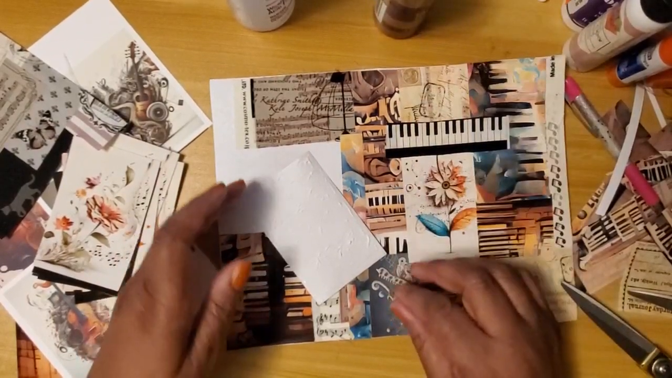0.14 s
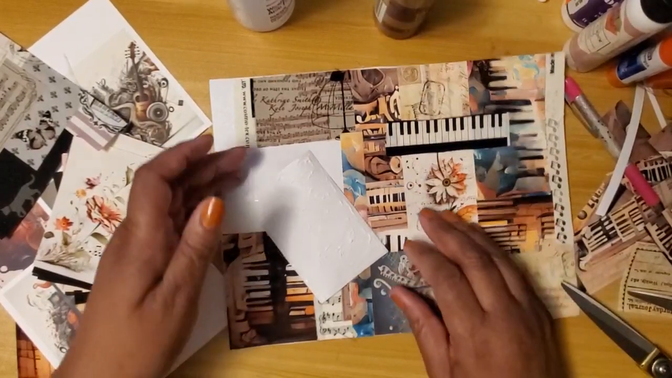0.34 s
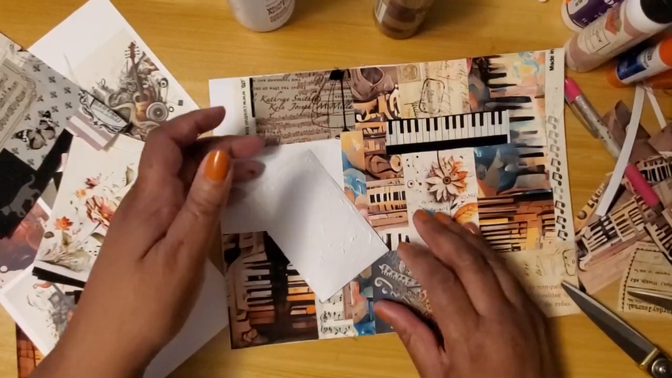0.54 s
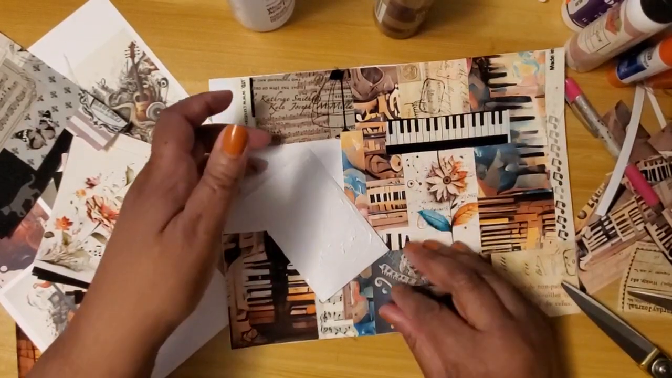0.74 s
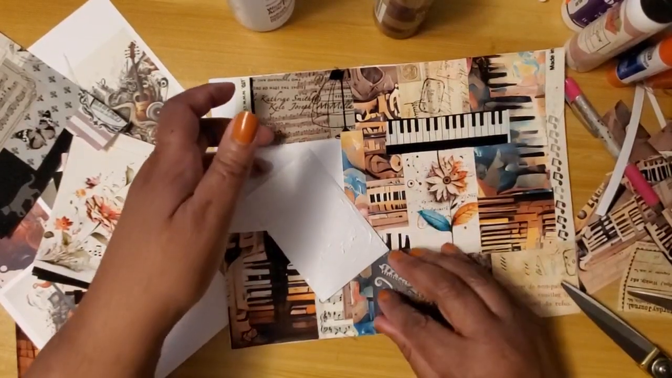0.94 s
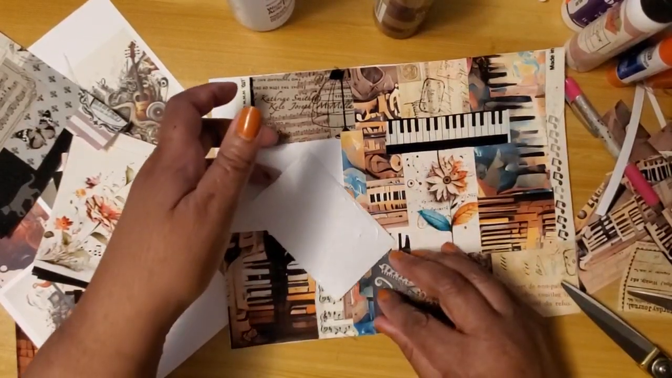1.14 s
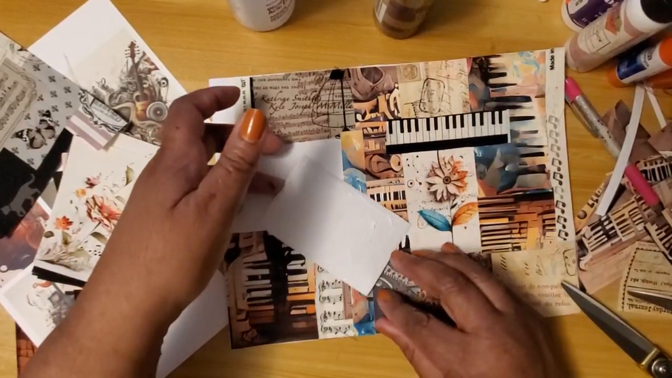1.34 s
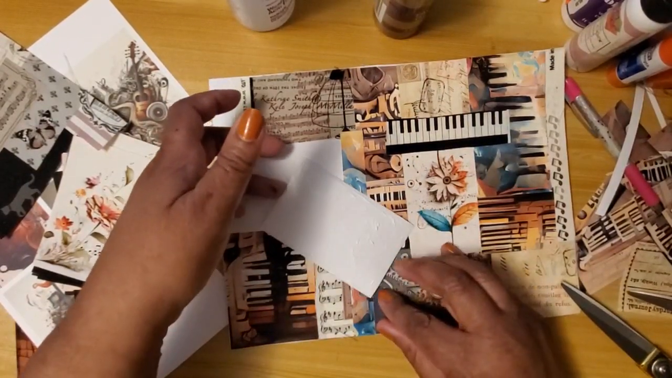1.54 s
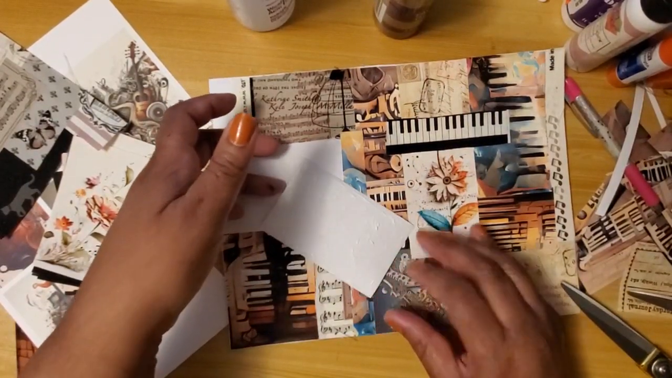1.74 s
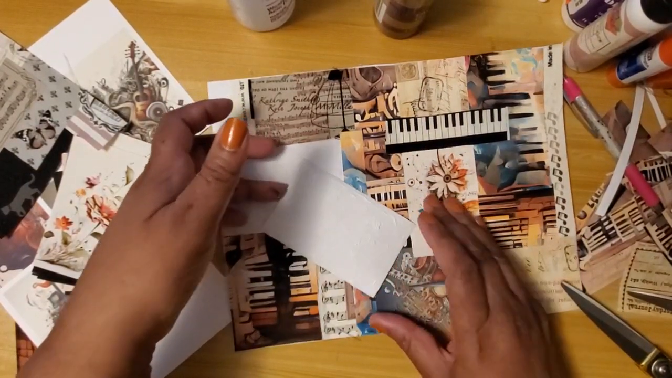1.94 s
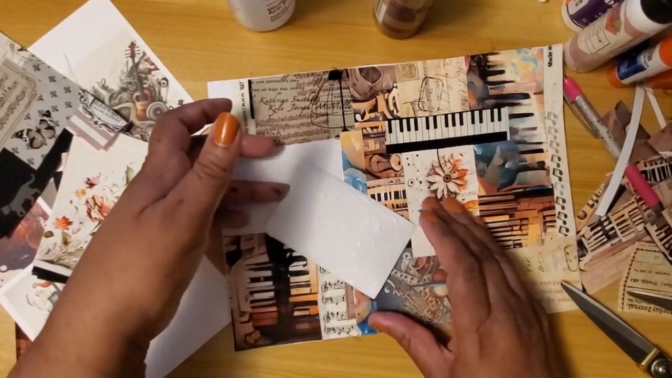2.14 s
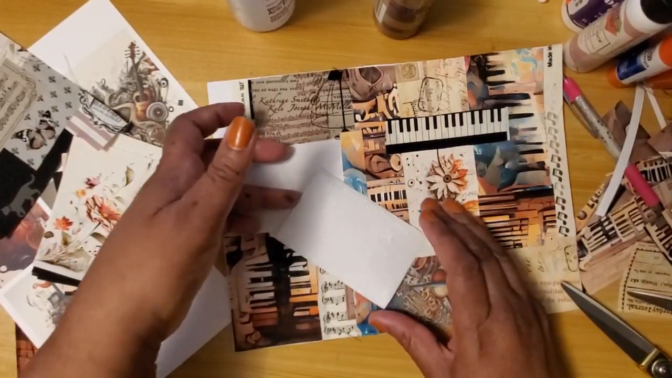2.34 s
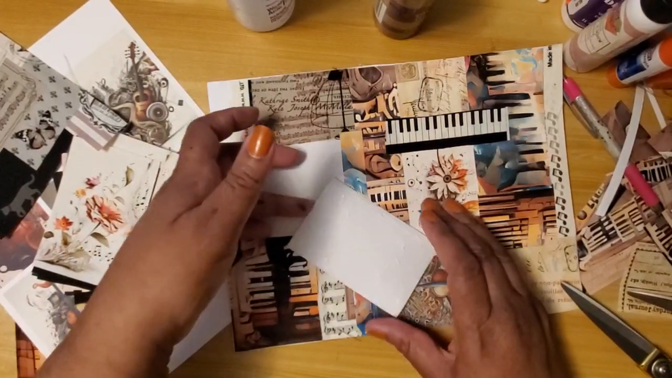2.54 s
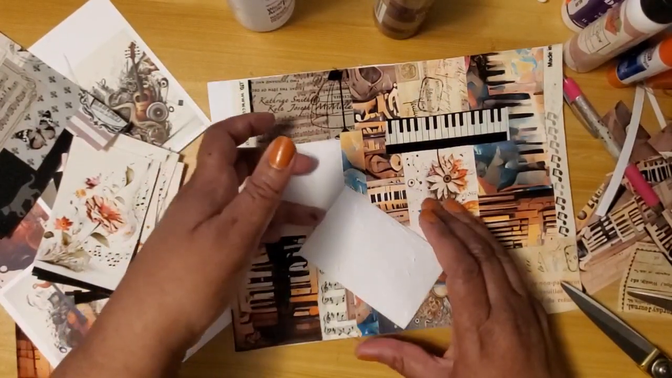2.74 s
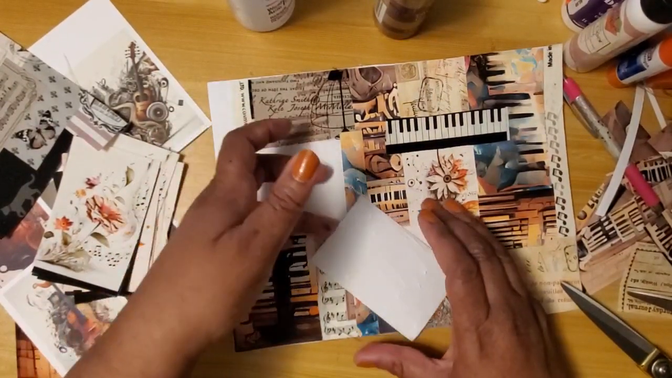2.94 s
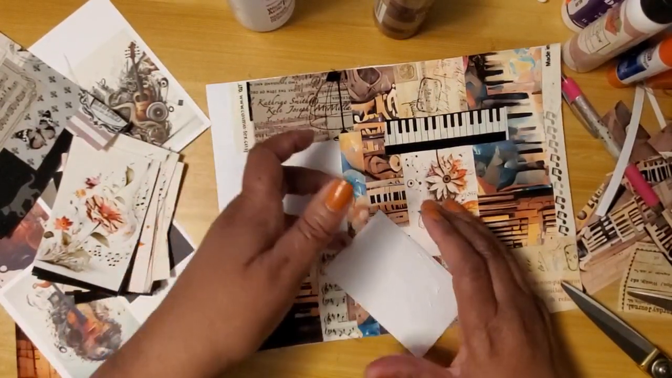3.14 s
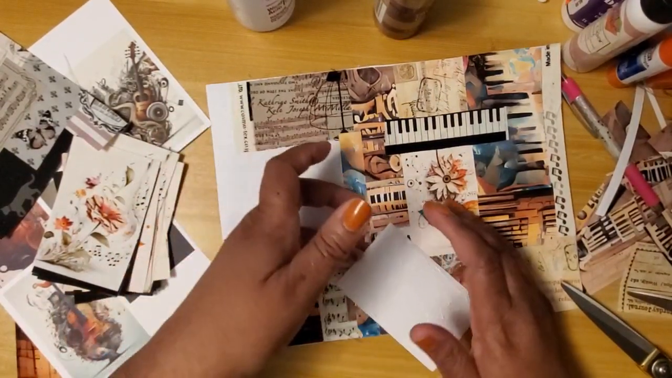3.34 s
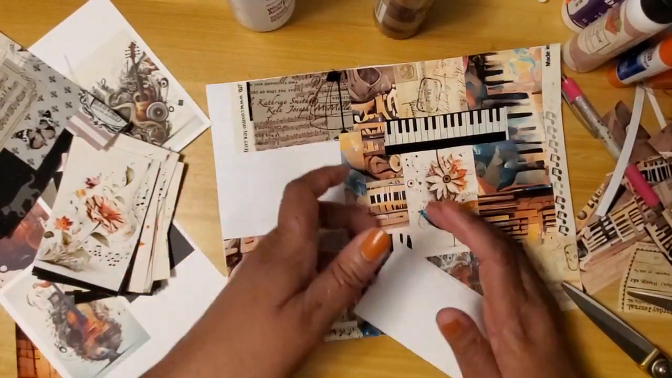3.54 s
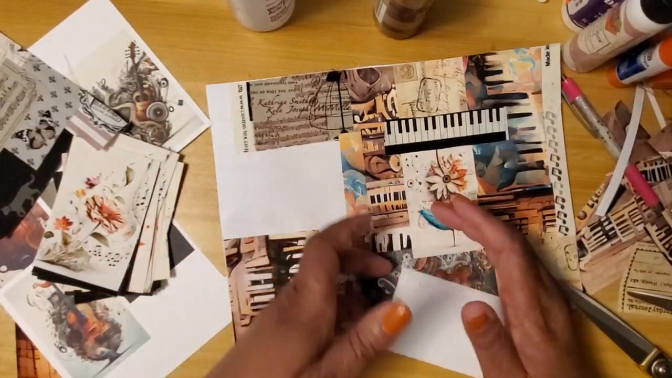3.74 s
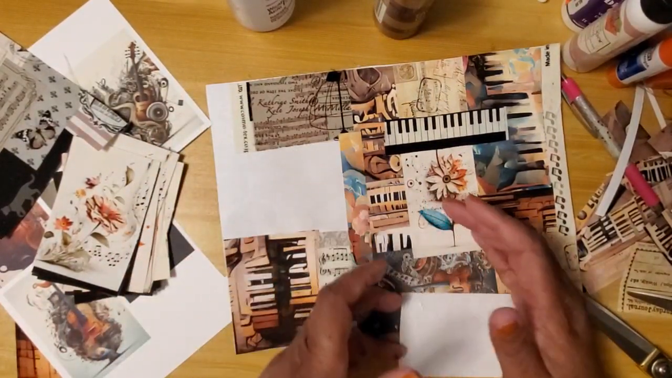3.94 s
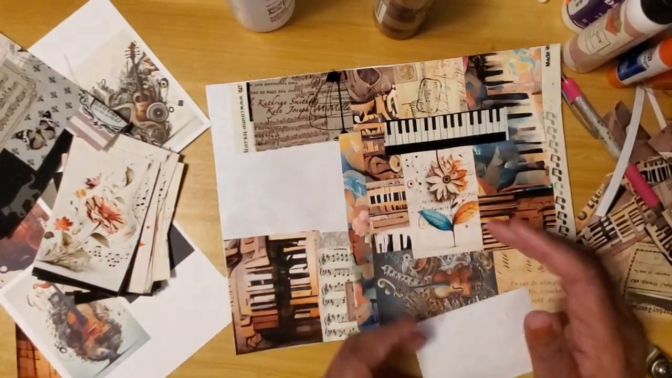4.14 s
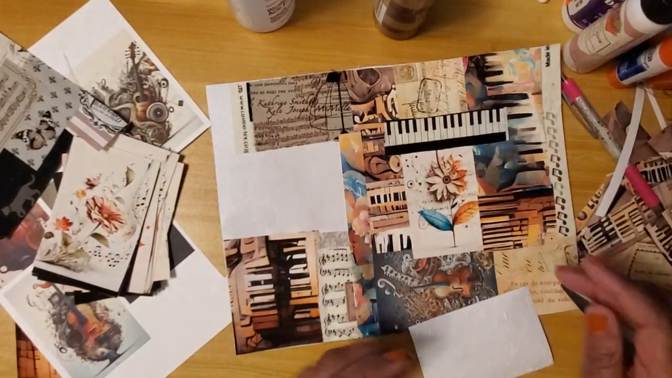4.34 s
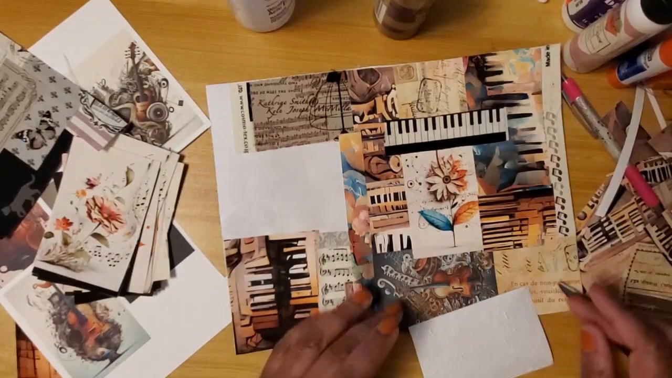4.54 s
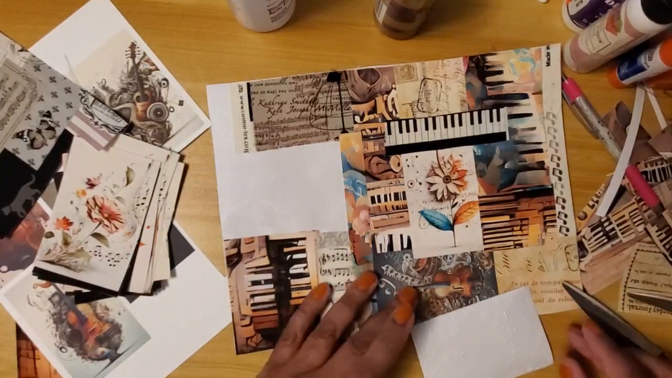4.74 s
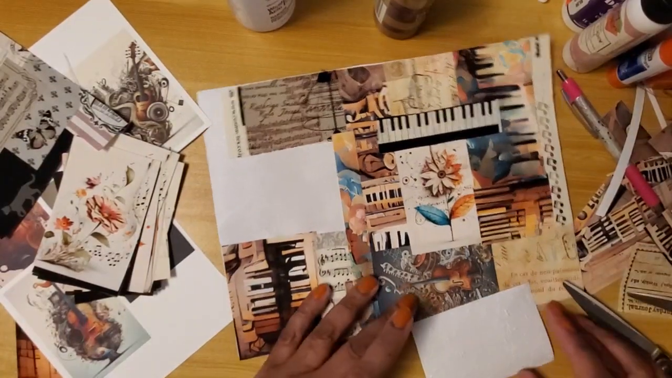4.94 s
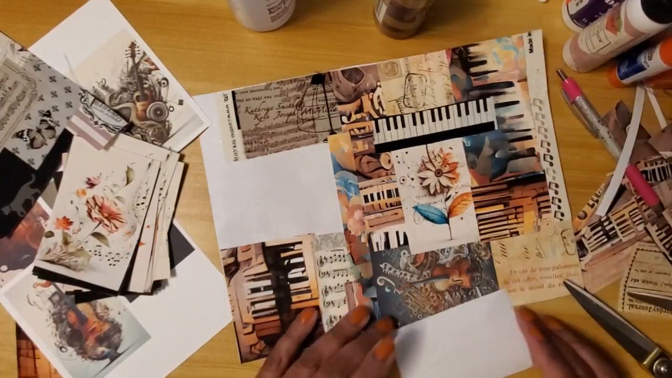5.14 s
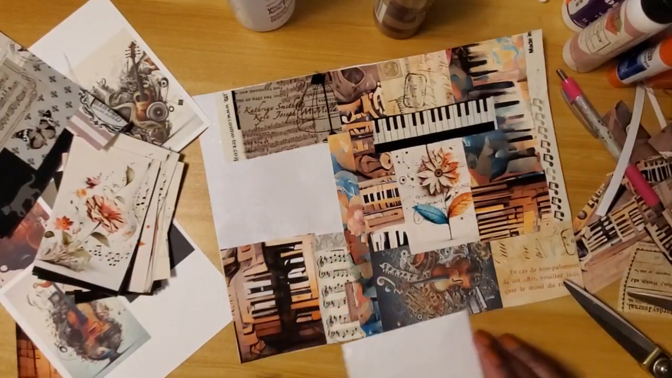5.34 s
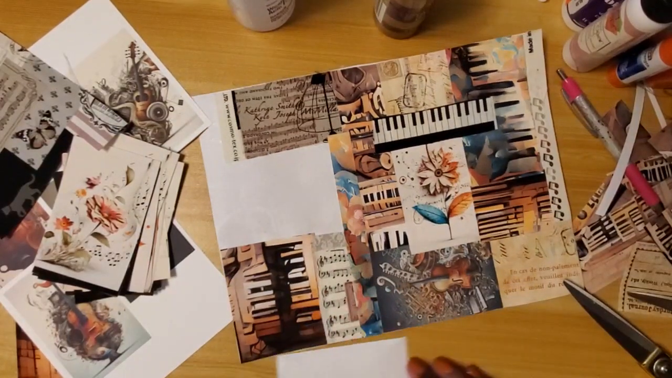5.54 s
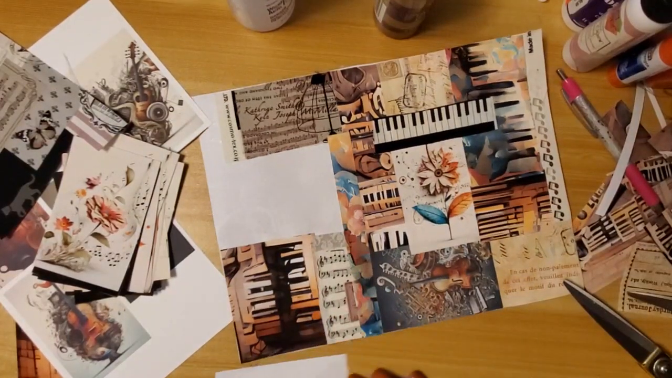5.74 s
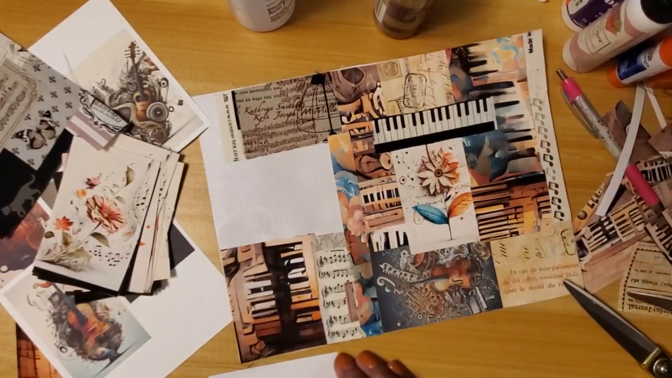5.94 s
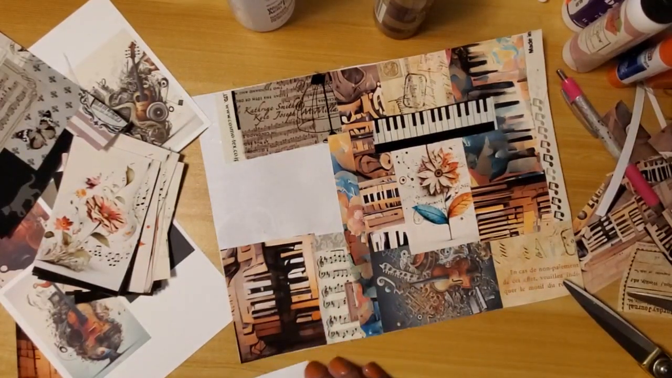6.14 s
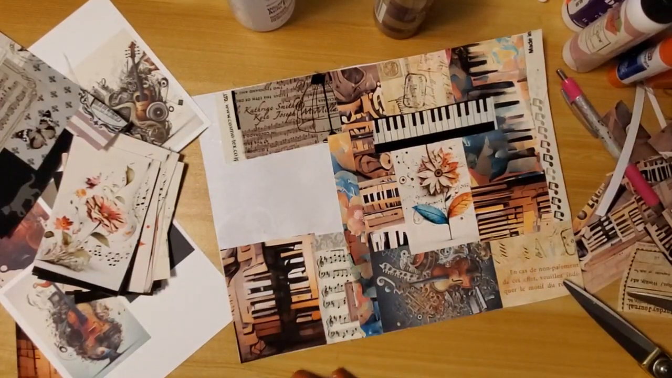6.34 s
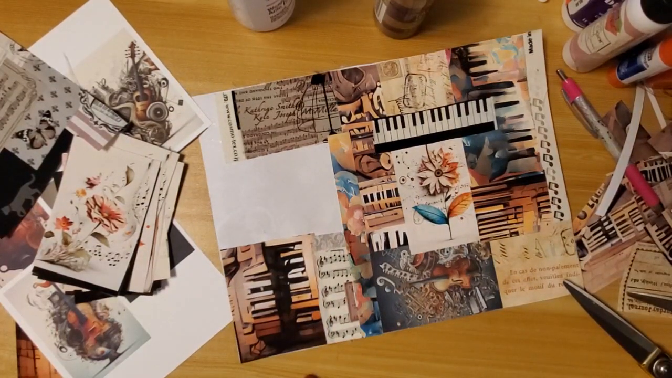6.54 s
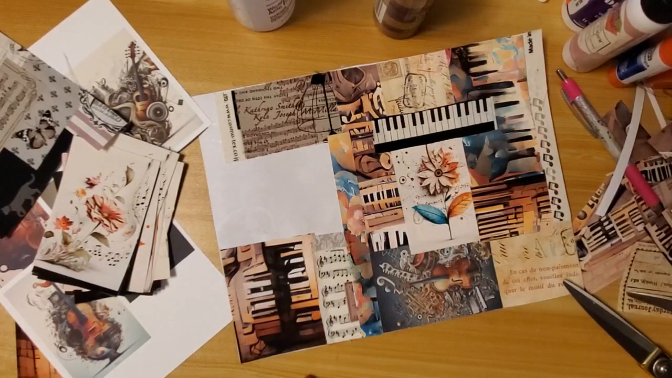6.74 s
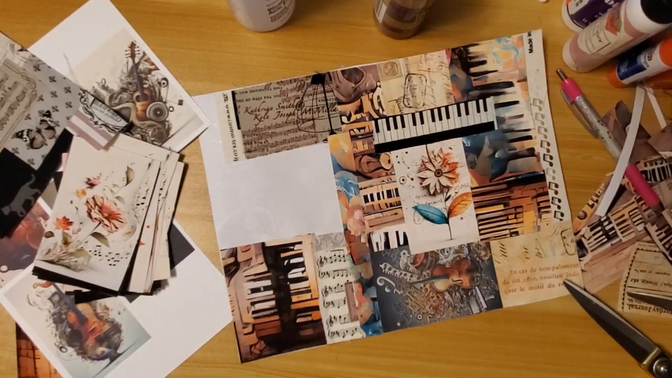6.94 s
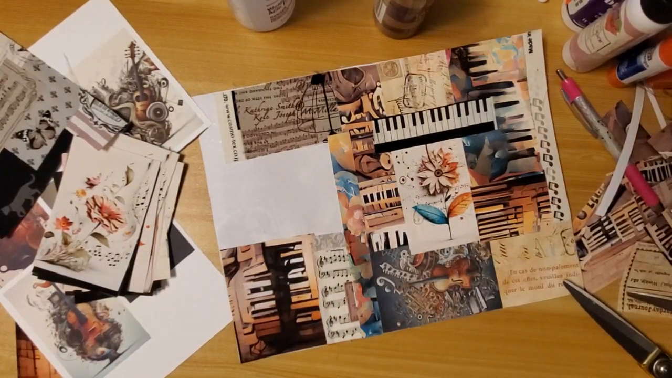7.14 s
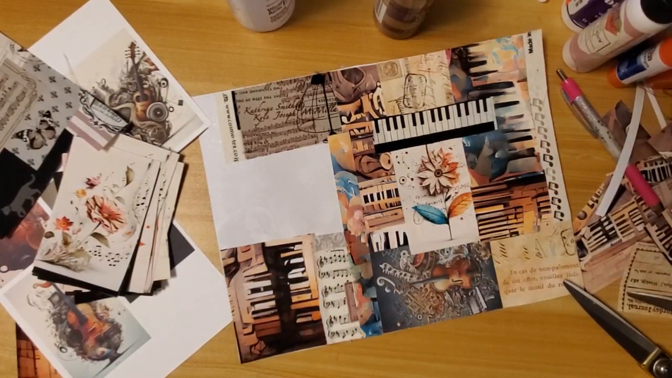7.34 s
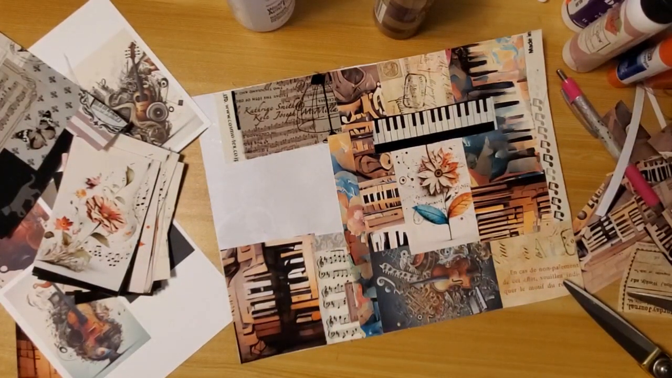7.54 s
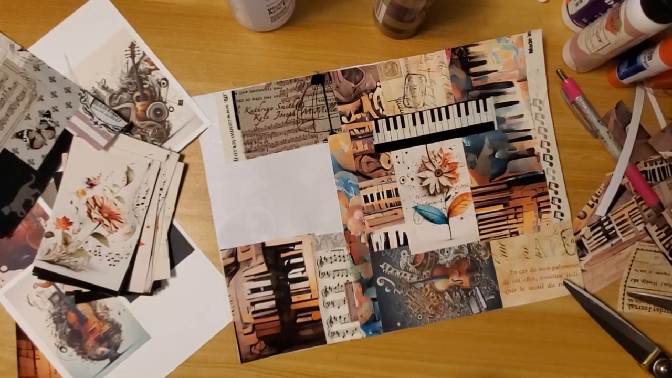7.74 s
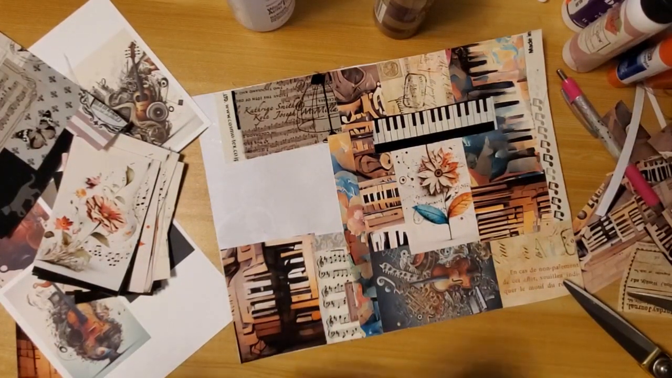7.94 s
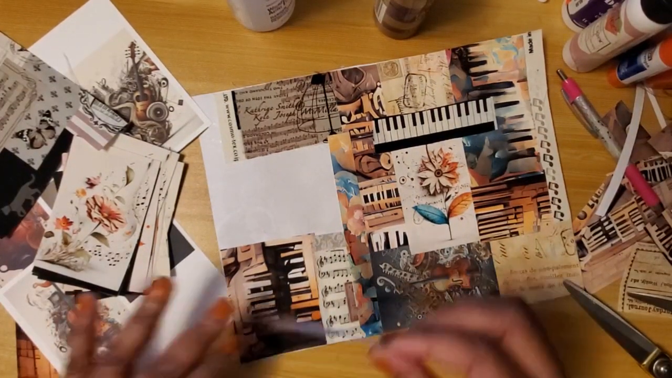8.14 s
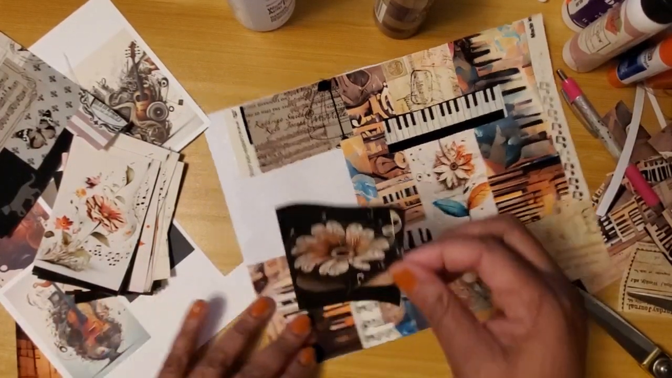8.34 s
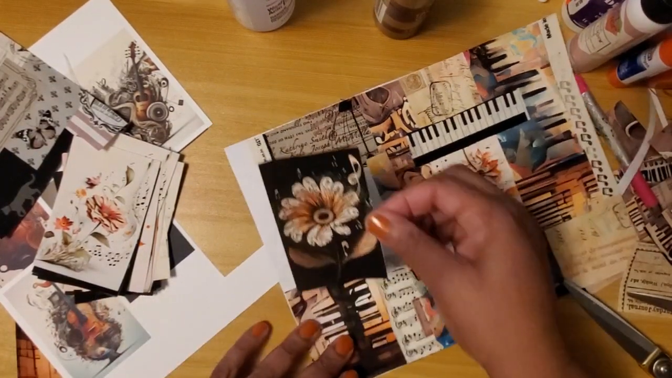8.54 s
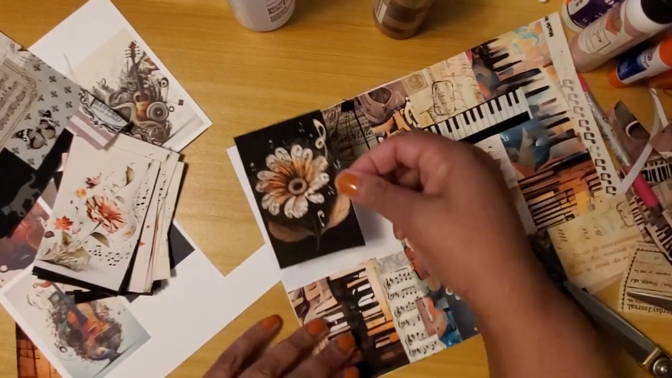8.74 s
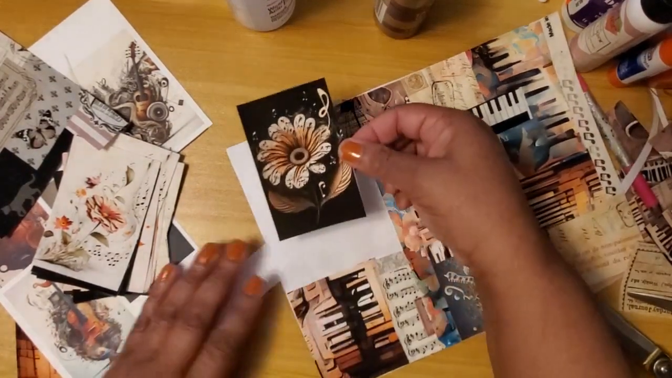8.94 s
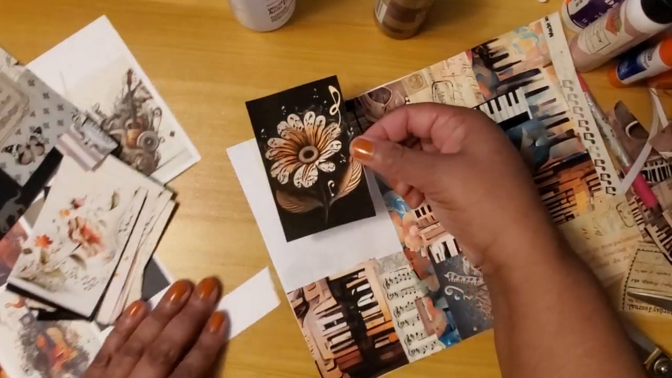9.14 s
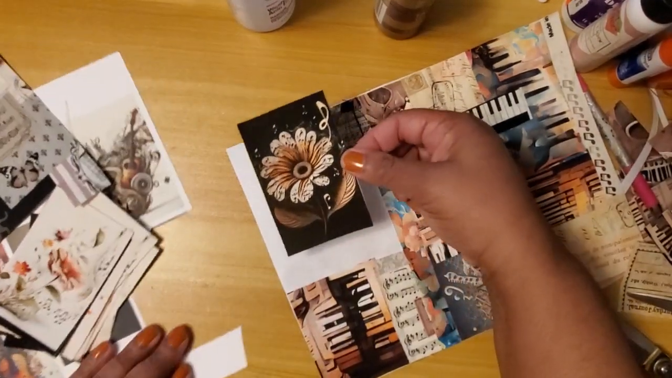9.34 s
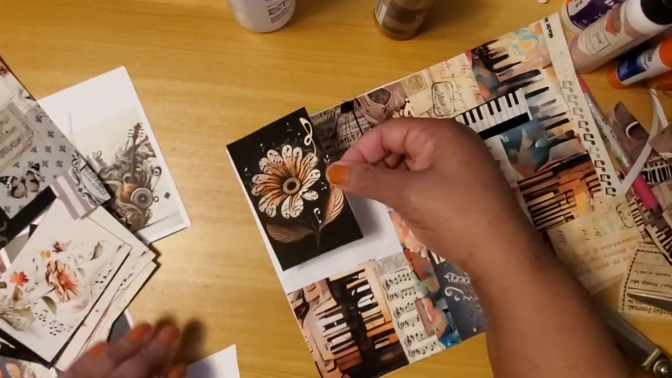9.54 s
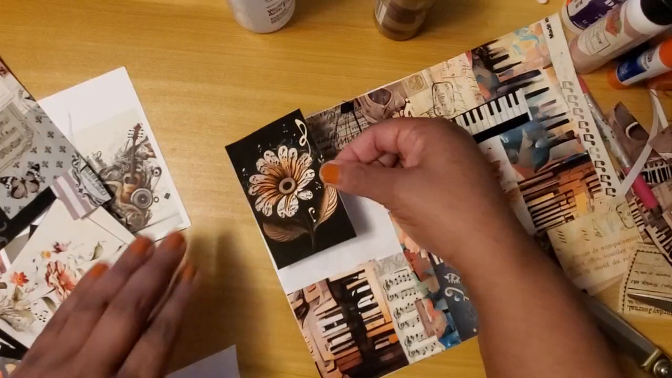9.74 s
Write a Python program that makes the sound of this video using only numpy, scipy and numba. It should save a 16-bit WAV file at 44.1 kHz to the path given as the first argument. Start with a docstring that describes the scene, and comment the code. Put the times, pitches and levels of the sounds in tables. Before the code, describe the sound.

Close, dry paper handling in a quiet room: soft scrapes, small ticks, a sudden object clacking onto the table, and a sharp paper snap.

```python
"""A quiet room with a wooden table: hands slide and pat sheets of paper under a phone.
Paper rubs as dense noise grains through wandering resonances; knocks and a landing hard object ring the modes
of the table top, and a 1.3 kHz ring from an earlier blow is left at the start; edges tick as short decaying
sines; chatter and a metal ring follow the landing.
A low rumble, two faint hums and a narrow hiss fill the room; the phone's limiter holds down the blow."""
import sys
import numpy as np
from scipy import signal
from scipy.fft import rfft, irfft
from scipy.io import wavfile
from scipy.ndimage import uniform_filter1d, minimum_filter1d
from numba import njit

SR = 44100
rng = np.random.default_rng(int(sys.argv[2]) if len(sys.argv) > 2 else 0)


def how_loud(loudness_db):
    """Turn decibels into a plain amplitude multiplier (0 dB gives 1, 20 dB gives 10)."""
    steps = np.asarray(loudness_db, float) / 20
    return 10 ** steps


def waveform_to_disk(signal):
    """Save audio, clipped to [-1, 1], as 16-bit WAV at the path in sys.argv[1]."""
    frames = np.transpose(np.atleast_2d(signal))
    scaled = np.clip(frames, -1, 1) * 32767
    samples = np.round(scaled).astype(np.int16)
    wavfile.write(sys.argv[1], SR, samples)


N = 431298
T = np.arange(N) / SR

# Spectrum of the rubbed sheet. Each row: frequency in Hz, level in dB.
SHEET_SPECTRUM = [(1500, -41), (2400, -22.5), (2800, -7), (3350, -1.5), (4100, -6), (5300, -5), (7000, -7),
                  (8200, -22.5)]
# Spectrum of the fibre hiss. Each row: frequency in Hz, level in dB.
FIBRE_SPECTRUM = [(4000, -27), (6000, 0.5), (8000, 1), (10000, -2.5), (13000, -3), (15200, -0.5),
                  (16500, -21.5)]
# Spectrum of the top-octave hiss. Each row: frequency in Hz, level in dB.
TOP_OCTAVE_SPECTRUM = [(9000, -30), (12000, -9), (14000, -1.5), (15500, 1), (16500, -18.5)]
# Spectrum of the rustling stack. Each row: frequency in Hz, level in dB.
STACK_SPECTRUM = [(800, -31.5), (1250, -3.5), (1450, -2), (2000, -1), (2500, 2.5), (2900, -7), (3600, -31)]
# Spectrum of the droning table top. Each row: frequency in Hz, level in dB.
TABLE_TOP_SPECTRUM = [(200, -21.5), (330, -5.5), (450, -3.5), (620, -6), (950, -7), (1200, -10.5),
                      (1700, -31.5)]
# The hand bears down, which brings out stack and table top.
# Each row: centre in seconds, half width (to 1/e) in seconds, boost in dB.
PRESSES = [(.05, 0.073, 12), (2.53, 0.024, 9), (3.53, 0.019, 6.5), (5.03, 0.073, 5.5), (5.51, 0.13, 7.5),
           (6.17, 0.06, 16), (8.54, 0.095, 8.5), (9.28, 0.088, 4)]


def slides():
    """Paper rubbed over paper: grains ring the sheet, hiss in the fibres, rustle the stack, drone in the table."""
    level, treble, top_octave, under, wood, pan_db, sheet_hz = gestures()
    press_db = sum(db * np.exp(-((T - s) / half_s) ** 2) for s, half_s, db in PRESSES)
    # the hand never drags evenly
    drag_db = 1.1 * walk(40) + 1.1 * walk(130)
    sheet = colour(grains(2.2), SHEET_SPECTRUM)
    # the free part of the sheet changes size as it moves; pressing lowers its resonance 1 % per dB
    sheet_hz = sheet_hz * (1 + 0.09 * walk(34) + 0.056 * walk(6.4) - 0.01 * press_db)
    sparse_crackle = colour(grains(7.5), SHEET_SPECTRUM)
    sheet = sheet + how_loud(-8) * sparse_crackle
    upper_hz = 1.5 * sheet_hz * (1 + .08 * walk(9))
    lower_gain = 1.09 * how_loud(2.5 * walk(60) + 2.1 * walk(12))
    lower = lower_gain * resonate(sheet, sheet_hz, 4.5)
    upper = 0.5 * how_loud(3.7 * walk(14)) * resonate(sheet, upper_hz, 5.56)
    sheet = 0.67 * sheet + lower + upper
    fibres = treble * how_loud(1.5 * walk(26)) * colour(grains(1.5), FIBRE_SPECTRUM)
    air_hiss = top_octave * how_loud(1.5 * walk(18)) * colour(grains(1.6), TOP_OCTAVE_SPECTRUM)
    stack = under * how_loud(press_db + 1.5 * walk(40)) * colour(grains(2.5), STACK_SPECTRUM)
    table_top = wood * how_loud(press_db + 0.92 * walk(25)) * colour(grains(5.5), TABLE_TOP_SPECTRUM)
    return how_loud(drag_db) * pan(pan_db) * (level * sheet + fibres + air_hiss + stack + table_top)


# How each contact sounds, by name. Each entry: treble, top-octave, stack and table-top shares in dB
# relative to the sheet, sheet resonance in Hz.
CONTACT = dict(finger=(0, -8.5, -24, -14.5, 5300), nail=(-6.5, -26, -15.5, -13, 5397),
           card=(-5, -16.5, -22.5, -16.5, 3601), sheet=(-6, -16.5, -14.5, -15.5, 3600),
           snatch=(-4, -11.5, -10.5, -15, 3000), pile=(3.5, -0.5, -7.5, -13.5, 5300),
           tap=(-18, -24, 6, 3, 2800), whisper=(7, 18, -4, 6.5, 5500))
# Short strokes, by contact. Each row: start in seconds, rise in seconds, time to fade 20 dB in seconds
# (0 mutes the row), level in dB, left minus right in dB.
STROKES = dict( finger=[(.19, 0.17, 0.85, -75, 1), (.392, 0.033, 0.17, -61.5, 0),
           (.665, 0.045, 0.2, -66.5, -1), (4.007, .003, 0.45, -68, 0), (8.865, 0.013, 0.14, -67.5, 2)],
           nail=[(.07, 0.029, .15, -66, .5), (.85, 0.078, 0.11, -65, 1), (1.68, 0.025, .1, -82, -1),
           (1.977, .004, .14, -63, 2), (2.001, 0.0034, .025, -54, 1)], card=[(2.02, .02, 0.2, -77, 3),
           (7.905, 0.014, 0.5, -83, 3)], sheet=[(-.02, .02, .3, -66, -0.5), (4.997, 0.023, 0.29, -57, 0)],
           snatch=[(8.341, 0.0031, 0.6, -59, 2.5)], tap=[(8.2, .006, .15, -79, 1), (8.66, .04, .4, -77, 0),
           (8.903, .003, .085, -63, 0.5)], pile=[(7.375, .01, 0, -86, 7.5)],
           whisper=[(7.93, 0.087, 0.7, -93.5, 5), (8.56, 0.071, 0.03, -80, -3), (9.04, .01, 0.8, -92, 5),
           (9.45, 0.093, 0.1, -92, 4)])
# Long drags. Each row: contact, left minus right in dB, pressure curve of (time in seconds, level in dB).
DRAGS = [ ("card", 0, [(1.157, -86), (1.197, -72), (1.293, -72), (1.359, -63.5), (1.4, -67), (1.45, -71),
         (1.513, -88), (1.64, -86)]), ("card", 0.4, [(2.24, -82), (2.33, -77), (2.39, -65.5), (2.51, -62),
         (2.545, -69.5), (2.58, -65.5), (2.71, -65), (2.92, -69), (3.05, -65.5), (3.09, -70), (3.15, -63),
         (3.29, -63), (3.45, -73.5), (3.52, -66), (3.58, -64.5), (3.64, -58.5), (3.7, -59.5), (3.75, -67.5),
         (3.82, -62), (3.87, -67.5), (3.9, -71), (4.0, -65.5), (4.08, -78), (4.14, -64), (4.22, -67),
         (4.28, -73.5), (4.46, -80), (4.72, -84)]), ("sheet", 0.46, [(5.06, -81), (5.18, -60),
         (5.247, -57.5), (5.285, -57), (5.335, -55), (5.36, -58.5), (5.507, -55), (5.69, -54),
         (5.75, -58.5), (5.78, -59), (5.847, -64.5), (6.02, -92.5)]), ("card", 4.2, [(6.14, -84),
         (6.226, -78.5), (6.282, -82), (6.364, -71.5), (6.454, -71), (6.56, -71), (6.63, -88)]),
         ("snatch", -.5, [(8.35, -59.5), (8.399, -51), (8.471, -58.5), (8.523, -51.5), (8.559, -48),
         (8.62, -58.5), (8.68, -68.5), (8.76, -84)]), ("pile", 3.8, [(9.04, -79.5), (9.108, -72),
         (9.208, -63), (9.338, -64.5), (9.42, -68.5), (9.445, -64), (9.52, -76), (9.68, -99)])]


def gestures():
    """Strokes and drags summed in power: layer levels, then balance and resonance weighted by loudness."""
    treble_follows = 0.9  # dB of treble and top octave per dB of pressure
    shapes = []
    for kind, pan_db, curve in DRAGS:
        s, db = np.transpose(curve)
        shapes.append((kind, pan_db, how_loud(np.interp(T, s, db, left=-200, right=-200))))
    for kind, rows in STROKES.items():
        for s, rise_s, fade_s, db, pan_db in rows:
            if fade_s == 0:
                continue
            rise = np.clip((T - s) / rise_s, 0, 1)
            fade_db = 20 * np.maximum(T - s - rise_s, 0) / fade_s
            shapes.append((kind, pan_db, rise * how_loud(db - fade_db)))
    # the floor sits at balance 0 dB and 4000 Hz
    total = np.full((7, N), 1e-12) * [[1], [1], [1], [1], [1], [0], [4000]]
    for kind, pan_db, gain in shapes:
        *shares_db, hz = CONTACT[kind]
        on = gain > 1e-6
        power = np.outer([1, *how_loud(2 * np.array(shares_db)), pan_db, hz], gain[on] ** 2)
        power[1:3] *= (gain[on] / gain.max()) ** (2 * treble_follows - 2)
        total[:, on] += power
    return (*np.sqrt(total[:5]), *(total[5:] / total[0]))


# Modes of the table top, also rung by landing(). Each row: frequency in Hz, level in dB, T60 in seconds.
TABLE_MODES = [(54, 20.5, 0.33), (116.5, 12.5, .25), (172, 12, 0.12), (246.7, 10, .12), (343.3, 11, 0.15),
               (420, 5, .1), (501, 1.5, 0.11), (550, 6, 0.031), (670, 6.5, 0.048), (828.4, -2.5, .1),
               (984, 1.5, 0.23), (1170, -3, 0.12), (1370, -12, 0.071), (1620, -9.5, .08),
               (1891, -1.5, 0.12), (2294, -6.5, 0.1), (2680, -8.5, .05), (3700, -10, .03)]
# Knocks on the table, including the low thud of the landing object, and at the start a 1.3 kHz ring
# left from an earlier blow. Each row: start in seconds, peak in dB, loudest pitch in Hz,
# ring length as a multiple of the free one, left minus right in dB.
KNOCKS = [(4.76, -33, 56, .6, -6), (4.765, -30, 250, .8, 0), (.004, -61, 1330, 5.5, 0),
          (.08, -64, 1330, 4, 0), (1.065, -65, 1310, .5, 2), (2.499, -60, 497, .5, 1),
          (3.529, -58.5, 1305, .5, -3), (4.627, -57.5, 258, .6, 7), (4.732, -53, 1000, .8, -2.5),
          (6.112, -46, 420, .3, -6), (6.122, -41.5, 503, .6, -0.5), (6.118, -62, 2620, .6, 1.5),
          (6.121, -57, 1100, .6, 0), (7.388, -67, 1170, .5, -2.5), (7.889, -67.5, 500, .5, -1),
          (8.172, -49, 470, .9, 2.5), (8.19, -46, 420, .9, 5), (8.18, -56.5, 1225, .6, -3),
          (8.38, -48.5, 54, .8, -14), (8.53, -48.5, 264, .7, 0), (8.905, -57, 1200, .5, 2),
          (9.108, -49, 101, .3, 1)]


def knocks():
    """Knocks, the landing's low thud and the leftover ring: each favours modes near one pitch, with its own decay."""
    out = np.zeros((2, N))
    hz, _, t60_s = np.transpose(TABLE_MODES)
    t = T[:SR // 10]
    for s, db, spot_hz, ring_ratio, pan_db in KNOCKS:
        spot_db = -30 * np.abs(np.log2(hz / spot_hz))
        # a duller knock comes from a longer touch
        thud = strike(np.transpose([hz, spot_db, ring_ratio * t60_s]), 250 / spot_hz)
        # a fading burst of small contacts roughens each sound
        settle = .07 * rng.standard_normal(len(t)) * how_loud(-60 * t / 0.12)
        settle[0] = 1  # the clean sound itself
        add(out, s, signal.fftconvolve(thud, settle[None], axes=1), db, pan(pan_db))
    return out


# The object lands and rebounds. Each row: start in seconds, peak in dB, contact length in ms.
LANDING = [(4.7562, -10, .05), (4.767, -14, 0.34), (4.777, -14, .1), (4.791, -15.5, .3), (4.803, -16.5, .1),
           (4.809, -21, .3), (4.822, -22.5, .1)]
# Spectrum of the chatter. Each row: frequency in Hz, level in dB.
CHATTER_SPECTRUM = [(30, -29.5), (55, 2), (170, 1.5), (350, 4), (500, -3), (700, -2.5), (1000, -3),
                    (1400, -2), (2000, -6.5), (2800, -2.5), (3700, 1), (5000, -10), (6500, -15),
                    (9000, -27.5), (13000, -24), (16000, -21)]
# Chatter stages, all starting at the first blow. Each row: hold in seconds, level in dB, fade in dB per second.
CHATTER_STAGES = [(.001, -13, 2500), (.05, -26.5, 429.5), (.1, -53, 79)]
# Modes of something metal on the table. Each row: frequency in Hz, level in dB, T60 in seconds.
METAL_MODES = [(1346, 0, 1.1), (1545, -8, .6), (1884, -3, 1.0), (2143, -4, .95), (2643, -8, .45),
               (3290, -6, .7)]


def landing():
    """A hard blow and its rebounds ring the table, with dense chatter between them; nearby metal rings on."""
    out, modes = np.zeros((2, N)), np.array(TABLE_MODES)
    first_s = LANDING[0][0]
    for s, db, contact_ms in LANDING:
        spot = modes + np.outer(rng.standard_normal(len(modes)), [0, 2.5, 0])
        spot[:, 2] *= .85  # the object shortens the ring
        # sound radiates with the speed of the top, which favours the upper modes
        add(out, s, np.diff(strike(spot, contact_ms)), db, pan(.6))
    crack = rng.standard_normal((2, 400)) * how_loud(-60 * T[:400] / 0.02)
    add(out, first_s, signal.lfilter([1], [1, -1.4, .7], crack), -13, pan(1.5))
    metal = np.zeros((2, N))
    add(metal, first_s, ring(METAL_MODES, 0.92), -48, pan(.6))
    # the metal lies loose, so its ring flutters
    out += metal * how_loud(3 * walk(30) + 3 * walk(90))
    chatter = colour(grains(3.5), CHATTER_SPECTRUM)
    dull = signal.sosfilt(signal.butter(4, 4300, fs=SR, output="sos"), chatter)
    since_s = T - first_s
    # extra treble fade: 160 dB per second after 54 ms
    bright_gain = how_loud(-160 * np.maximum(since_s - .054, 0))
    stages = [how_loud(db - fade_db_s * np.maximum(since_s - hold_s, 0)) for hold_s, db, fade_db_s in CHATTER_STAGES]
    level = (since_s > 0) * sum(stages)
    return out + level * (dull + bright_gain * (chatter - dull))


# Paper edges tick. Each row: start in seconds, peak in dB, pitch in Hz, left minus right in dB.
TICKS = [(0.3973, -47.5, 4830, -4), (1.9793, -57, 7290, -2), (1.9854, -55, 5420, -0.5),
         (2.004, -42.5, 4580, -3), (2.011, -63, 4160, 10), (4.0085, -44, 3380, -1), (8.3454, -47, 3700, 8),
         (8.5634, -26, 2590, -6), (8.7044, -55, 4450, -2.5), (8.8723, -52, 6410, 0.0),
         (8.9053, -47.5, 2580, -5), (9.0403, -60, 6480, 13)]


def ticks():
    """A paper edge snaps: a short decaying sine with a brief rustle of differentiated noise."""
    out, t = np.zeros((2, N)), T[:4000]
    fade = how_loud(-60 * t / 0.018)
    for s, db, hz, pan_db in TICKS:
        rustle = np.diff(rng.standard_normal((2, len(t) + 1))) * fade
        snap = np.sin(2 * np.pi * hz * t) * fade ** 3
        add(out, s, 0.28 * rustle + snap, db, pan(pan_db))
    return out


# Spectrum of the rumble. Each row: frequency in Hz, level in dB.
RUMBLE_SPECTRUM = [(15, -51), (25, -27.5), (43, 3.5), (168, -0.5), (234, -5.5), (271, -6.5), (320, -17.5),
                   (357, -12), (384, -24.5), (413, -16.5), (515, -21.5), (860, -29.5), (1290, -34.5),
                   (1440, -37), (2000, -44), (2600, -75.5), (4400, -120)]
# Balance of the room tone. Each row: frequency in Hz, left minus right in dB.
AIR_BALANCE = [(30, -6), (60, 0.5), (110, -.5), (200, -0.5), (400, 1.5), (1300, 3), (4400, 4), (8000, 12),
               (15000, 0)]
# Swell of the rumble. Each row: time in seconds, level of 110-2700 Hz in dB, level of 30-110 Hz in dB.
RUMBLE_SWELL = [(0, -54, -52.5), (.5, -63, -61), (1.8, -61, -58.5), (3.2, -61, -59), (4.3, -57, -59),
                (4.8, -59, -53.5), (5.6, -60, -56), (5.8, -61.5, -57.5), (7.4, -63, -62), (8.1, -63, -62.5),
                (8.55, -57, -52), (8.9, -63, -65), (9.12, -61, -56), (9.78, -62, -59.5)]
# Spectrum of the hiss. Each row: frequency in Hz, level in dB.
HISS_SPECTRUM = [(900, -27.5), (1500, -4.5), (2000, -7), (4400, -11.5), (5200, -18), (5900, -11.5),
                 (6560, 0), (7050, -9), (7500, -22.5), (10000, -21.5), (13000, -16), (15200, -12.5),
                 (16400, -20)]
# One list per hum. Each row: time in seconds, pitch in Hz, level in dB.
HUMS = [
    [(.8, 112, -64), (1.6, 109.4, -59), (2.3, 110.5, -58.5), (3.3, 104.1, -56), (3.6, 103.8, -61),
     (4.6, 106.2, -58.5), (5.6, 104.4, -66)],
    [(8.15, 117.5, -58), (8.6, 119.2, -61.5), (9.0, 119.3, -64), (9.78, 119.2, -62.5)],
]


def air():
    """Room tone: noise rumble that swells, a steady narrow hiss, sine hums that waver; noise reaches the left first."""
    pair = rfft(ports(rng.standard_normal((2, N)))) * pan(over_hz(AIR_BALANCE))
    right_lag_s = 0.00019
    pair[1] *= np.exp(-2j * np.pi * np.fft.rfftfreq(N, 1 / SR) * right_lag_s)
    pair = irfft(pair, N)
    tone = colour(pair, RUMBLE_SPECTRUM)
    room_db, deep_db = read(RUMBLE_SWELL)
    low = band(tone, 110, 2700) * how_loud(room_db + 0.87 * walk(4.6))
    deep = band(tone, 30, 110) * how_loud(deep_db + 1.5 * walk(5.3))
    out = low + deep + colour(pair, HISS_SPECTRUM) * how_loud(-78)
    for hum in HUMS:
        # fade in over 0.15 s and out over 0.23 s
        before = (hum[0][0] - .15, hum[0][1], -90)
        after = (hum[-1][0] + 0.23, hum[-1][1], -90)
        hz, db = read([before, *hum, after])
        level = np.sqrt(2) * how_loud(db + 3 * walk(4.6) + 2.5 * walk(22))
        out = out + level * np.sin(2 * np.pi * np.cumsum(hz + 3.5 * walk(12)) / SR)
    return out


def room(dry, t60_s, wet_db):
    """Small room: decaying noise, duller than the direct sound."""
    t = T[:SR // 2]
    tail = ports(rng.standard_normal((2, SR // 2))) * how_loud(-60 * t / t60_s) * (t > .002)
    tail = signal.lfilter([1], [1, -.4], tail)
    tail = tail / np.sqrt((tail ** 2).sum(axis=1, keepdims=True))
    return dry + how_loud(wet_db) * signal.fftconvolve(dry, tail, axes=1)[:, :N]


# What differs between the ports, below what they share. Each row: frequency in Hz, level in dB.
PORT_DIFFERENCE = [(30, 0), (60, -2), (110, -9), (200, -15), (380, -9), (700, -4.5), (1300, -2),
                   (2400, -1.5), (4400, -1.5), (8000, -.5), (15000, -.5)]


def ports(pair):
    """Two unrelated sounds become what two nearby microphone ports hear: bass partly alike, treble apart."""
    mid, side = rfft(pair)
    size = pair.shape[1]
    side_db = over_hz(PORT_DIFFERENCE, size)
    side = side * how_loud(side_db)
    return irfft(np.array([mid + side, mid - side]) / np.sqrt(1 + how_loud(2 * side_db)), size)


def grains(spread_db):
    """Fibres catch and let go: dense clicks of uneven size."""
    size = how_loud(spread_db * np.minimum(rng.exponential(size=N), 5))
    return ports(size * rng.standard_normal((2, N)))


def ring(modes, length_s):
    """Modes rung by one blow; the higher a mode, the more its phase differs between the ports, up to a limit."""
    t = T[:int(length_s * SR), None]
    hz, db, t60_s = np.transpose(modes)
    apart = np.minimum(hz / 1500, 1.1) * rng.choice([-1, 1], len(hz))
    fade = how_loud(db - 60 * t / t60_s)
    return np.array([(fade * np.sin(2 * np.pi * hz * t + lead)).sum(axis=1) for lead in (apart / 2, -apart / 2)])


def push(contact_ms):
    """Half-sine contact force: a softer touch pushes longer and duller."""
    k = np.arange(128)
    return np.sin(np.pi * np.clip((k + .5) / (contact_ms * SR / 1000 + 1), 0, 1))


def strike(modes, contact_ms):
    """The modes rung by a contact force of the given length."""
    return signal.fftconvolve(ring(modes, .4), push(contact_ms)[None], axes=1)


@njit
def svf(x, hz, q):
    """State-variable band-pass whose centre moves, gain 1 at the centre."""
    y, b, l, k = np.empty(len(x)), 0., 0., 1 / q
    for i in range(len(x)):
        g = np.tan(np.pi * hz[i] / SR)
        v = (b + g * (x[i] - l)) / (1 + g * (g + k))
        b, l, y[i] = 2 * v - b, l + 2 * g * v, k * v
    return y


def resonate(pair, hz, q):
    """Both ports through the same moving resonance."""
    return np.array([svf(port, hz, q) for port in pair])


def read(table):
    """Columns of a curve, one value a sample."""
    s, *columns = np.transpose(table)
    return [np.interp(T, s, c) for c in columns]


def over_hz(table, size=N):
    """A (Hz, value) table at every bin of a transform."""
    hz, value = np.transpose(table)
    return np.interp(np.log(np.fft.rfftfreq(size, 1 / SR) + 1), np.log(hz), value)


def colour(x, table):
    """Give x the spectrum of the table; rms 1."""
    y = irfft(rfft(x) * how_loud(over_hz(table)), N)
    return y / np.std(y)


def band(x, lo_hz, hi_hz):
    """Steep band-pass; rms 1."""
    y = signal.sosfilt(signal.butter(3, [lo_hz, hi_hz], "bandpass", fs=SR, output="sos"), x)
    return y / np.std(y)


def walk(rate_hz):
    """Random levels held 1 / rate_hz seconds and smoothed twice; spread near 1."""
    k = int(SR / rate_hz)
    held = np.repeat(rng.standard_normal(N // k + 1), k)
    return 1.1 * uniform_filter1d(uniform_filter1d(held, k), k)[:N]


def pan(db):
    """Left and right gains from left minus right in dB."""
    return how_loud(np.array([db, -db]) / 2)


def add(out, s, sound, db, gains):
    """Mix a sound in at time s with peak level db before the channel gains."""
    i = int(s * SR)
    sound = sound[..., :N - i]
    out[:, i:i + sound.shape[-1]] += how_loud(db) * np.reshape(gains, (2, 1)) * sound / np.abs(sound).max()


def scene():
    """Everything on the table sounds in the room, over the room tone."""
    return room(slides() + ticks() + knocks() + landing(), .22, -13.5) + air()


@njit
def follow(x, attack, release):
    """Envelope that rises fast and falls slowly."""
    e, out = 0., np.empty(len(x))
    for i in range(len(x)):
        e += (x[i] - e) * (attack if x[i] > e else release)
        out[i] = e
    return out


def roll_off(x):
    """The treble ends steeply here."""
    return signal.sosfilt(signal.butter(12, 16550, fs=SR, output="sos"), x)


def record(dry):
    """The phone's limiter looks a little ahead, holds the loudest blow down and lets go quickly."""
    attack_s, release_s, threshold_db = .0003, 0.011, -6
    peak = -minimum_filter1d(-np.abs(dry).max(axis=0), size=96)  # running maximum, 48 samples either way
    envelope = follow(peak, 1 / (attack_s * SR), 1 / (release_s * SR))
    # takes off 0.7 dB per dB over the threshold
    gain = np.minimum(1, (how_loud(threshold_db) / (envelope + 1e-9)) ** .7)
    return roll_off(dry * gain)


dry = scene()
out = record(dry)
waveform_to_disk(out)
```